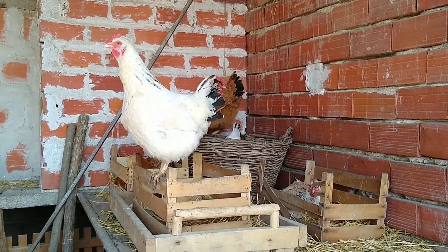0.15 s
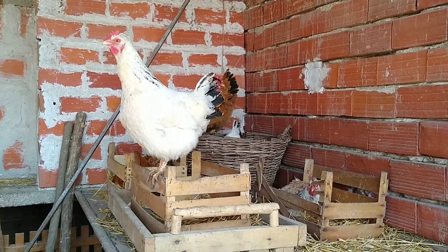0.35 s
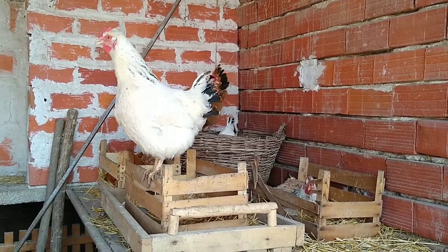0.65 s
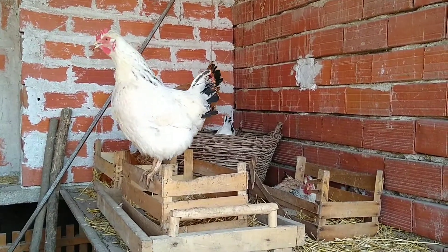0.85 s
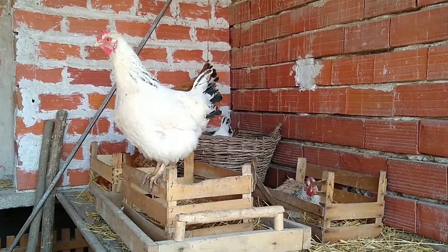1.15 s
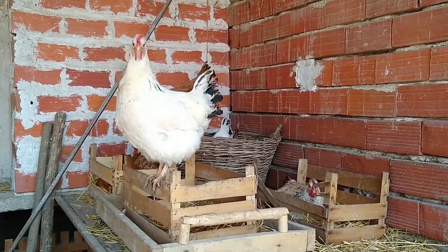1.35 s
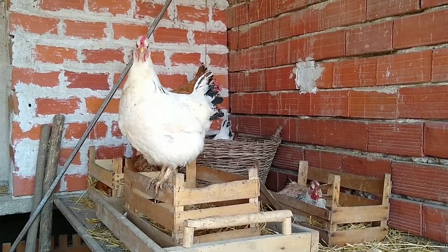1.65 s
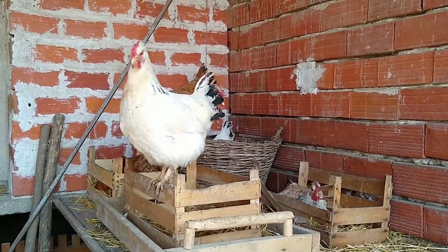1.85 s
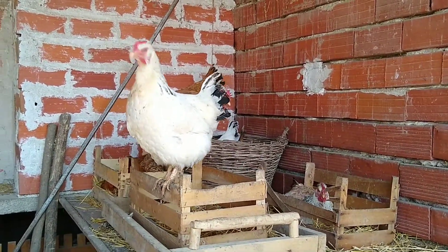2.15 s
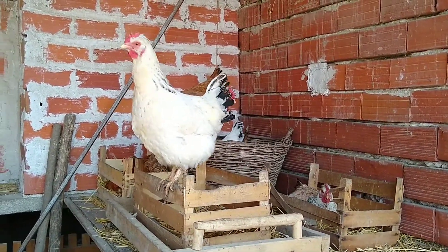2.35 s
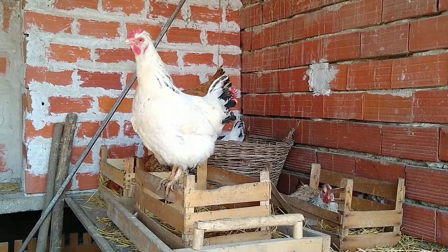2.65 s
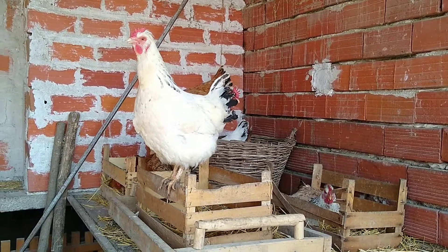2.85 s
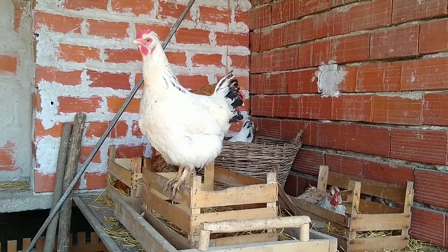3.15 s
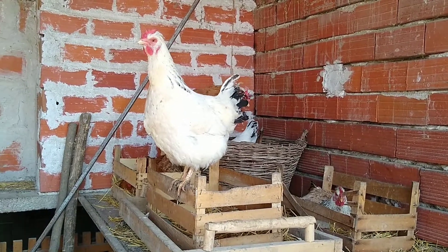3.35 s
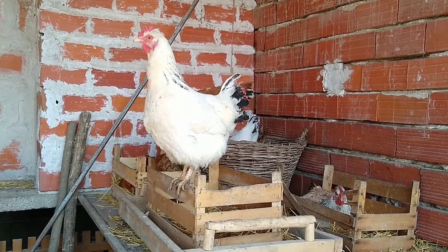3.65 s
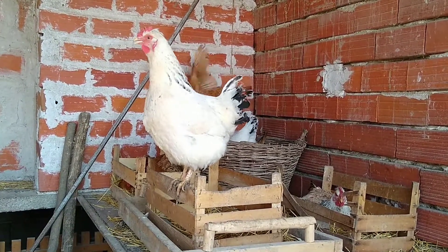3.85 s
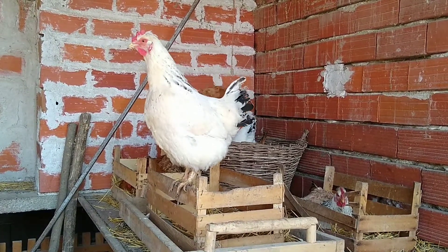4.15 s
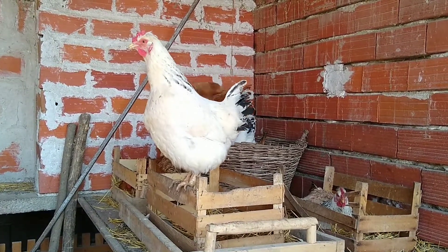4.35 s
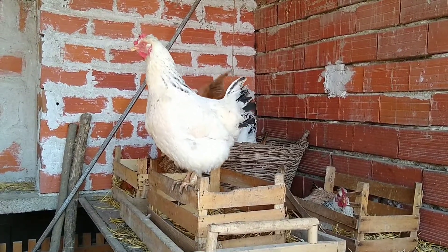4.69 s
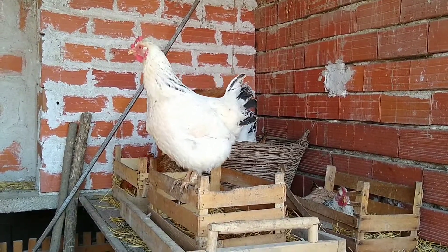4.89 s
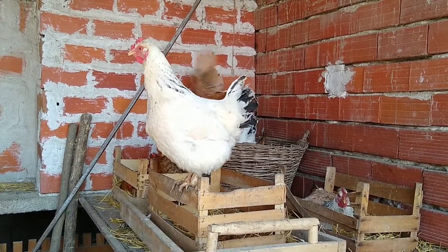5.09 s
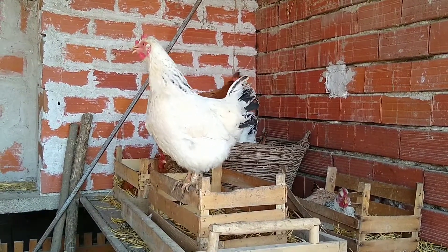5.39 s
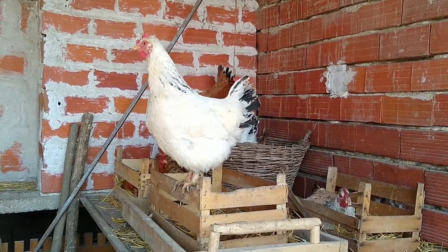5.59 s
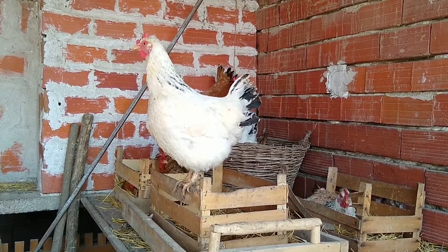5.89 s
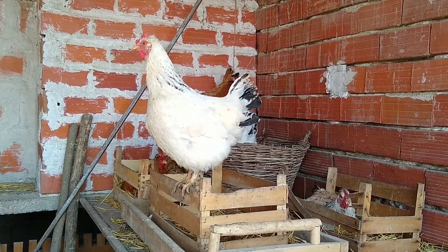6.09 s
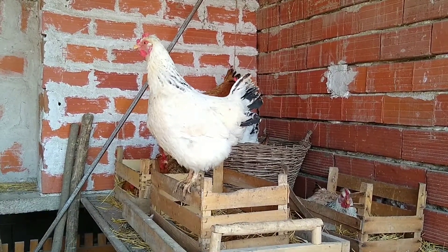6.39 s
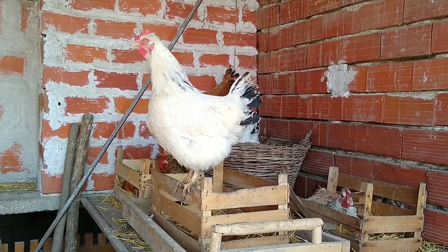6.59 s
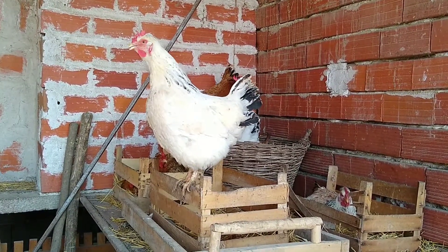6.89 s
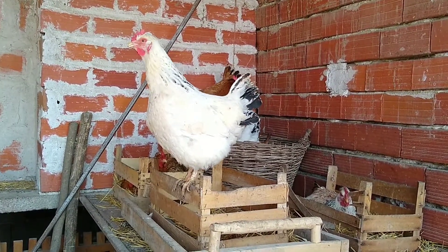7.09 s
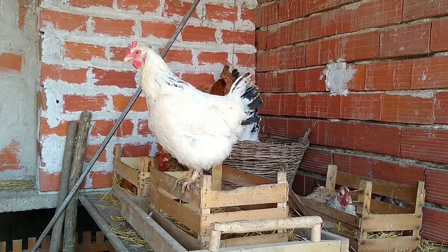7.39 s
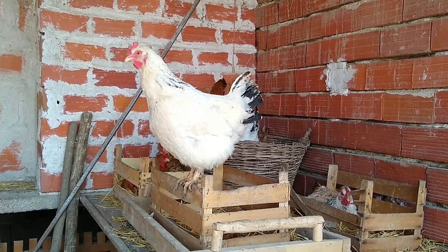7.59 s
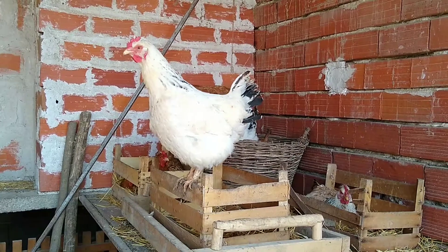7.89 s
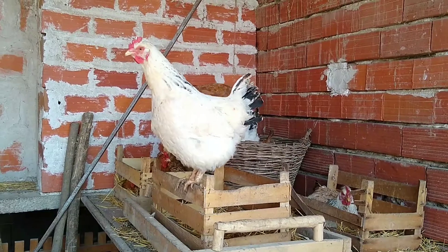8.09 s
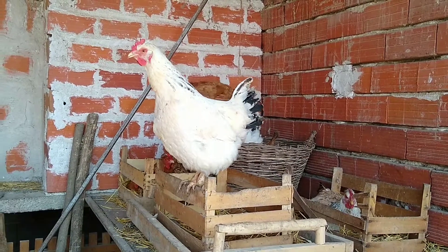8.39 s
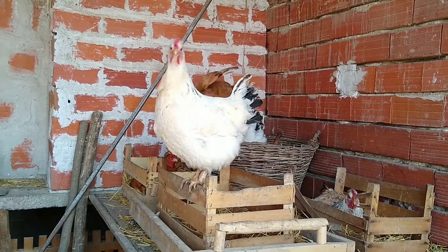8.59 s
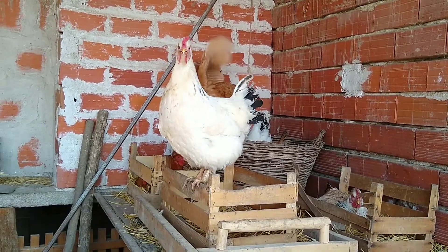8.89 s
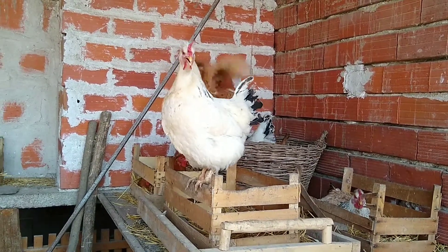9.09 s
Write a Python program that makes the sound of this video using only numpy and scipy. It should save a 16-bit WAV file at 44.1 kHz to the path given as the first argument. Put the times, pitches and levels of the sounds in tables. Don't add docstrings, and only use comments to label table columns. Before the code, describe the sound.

Close hens give rapid raspy clucks, soft answering clucks and occasional stretched squawks between brick walls, with a light breeze brushing the microphone.

```python
import sys
import numpy as np
from scipy import signal
from scipy.fft import rfft, irfft, next_fast_len
from scipy.io import wavfile
from scipy.ndimage import uniform_filter1d

SR = 44100
rng = np.random.default_rng(int(sys.argv[2]) if len(sys.argv) > 2 else 0)


def elevation(decibels):
    levels = np.asarray(decibels, float)
    return 10 ** (levels / 20)


def wav_out(sig):
    wavfile.write(sys.argv[1], SR, np.round(np.clip(np.atleast_2d(sig).T, -1, 1) * 32767).astype(np.int16))


N = 407484


def at_hz(points, hz):
    points = np.array(points)
    return np.interp(np.log(hz + 1), np.log(points[:, 0]), points[:, 1])


def coloured(x, response):
    size = next_fast_len(N + SR // 2)
    hz = np.arange(size // 2 + 1) * SR / size
    return irfft(rfft(x, size) * response(hz), size)[..., :N]


def lag(hz, seconds):
    return np.exp(-2j * np.pi * hz * seconds)


def resonance(x, hz, width_hz):
    r = np.exp(-np.pi * width_hz / SR)
    poles = [1, -2 * r * np.cos(2 * np.pi * hz / SR), r * r]
    return signal.lfilter([(1 - r * r) / 2, 0, (r * r - 1) / 2], poles, x)


def evened(x, seconds):
    return x / np.sqrt(uniform_filter1d(x ** 2, round(seconds * SR)) + 1e-12)


def add(track, start_s, sound):
    at = round(start_s * SR)
    track[max(at, 0):at + len(sound)] += sound[max(-at, 0):N - at]


def voice(pitch_hz, level_db, rough, alternate, upper, upper_db, throat_hz, width_hz,
          chest_hz, chest_db, bright_hz, rasp_db, vary_db):
    size = len(pitch_hz)
    t = np.arange(size) / SR
    timing, push, waver, flutter = rng.standard_normal((4, 400))
    air = rng.standard_normal(size)
    shape = rng.standard_normal(len(upper))

    pitch_hz = pitch_hz * (1 + 0.0075 * np.interp(t * 70, np.arange(400), waver))
    cycle = np.cumsum(pitch_hz / SR).astype(int)
    jitter = (1 + 0.2 * rough ** 2 * timing[cycle]).clip(0.6, 1.4)
    phase = np.cumsum(pitch_hz * jitter / SR) - 0.5
    count = np.round(phase).astype(int)
    offset = phase - count

    top = 2 * int(SR / 3 / pitch_hz.max()) + 1
    pulses = np.sinc(top * offset) / np.sinc(offset) * np.sqrt(top / 2)
    strength = (1 + alternate * (-1.0) ** count) * elevation(3.87 * rough * push[count])
    puffs = 1.1 * rough * air * (1.1 + np.cos(np.pi * offset) ** 2)
    source = strength * pulses + puffs

    closed = np.exp(-t / 0.016)
    low = resonance((1 - closed) * source, throat_hz, width_hz)
    low = low + resonance(closed * source, 0.78 * throat_hz, 120)
    low = resonance(low, 0.99 * throat_hz, 696)
    low = low + elevation(chest_db) * resonance(source, chest_hz, 113)

    breathy = source + 0.55 * air
    high = 0
    for k, (hz, width, db) in enumerate(upper):
        varied_hz = hz * (1 + vary_db / 100 * shape[k - 1])
        ring = resonance(resonance(breathy, hz, 4 * width), varied_hz, width)
        high = high + (-1) ** k * elevation(db + vary_db * shape[k]) * ring
    bright = resonance(resonance(source, bright_hz, 450), bright_hz, 170)
    rasp = elevation(rasp_db) * breathy
    high = evened(high + elevation(12) * bright, 0.1) + rasp

    flutter_db = 2.2 * np.interp(t * 60, np.arange(400), flutter)
    return elevation(level_db + flutter_db) * (evened(low, 0.068) + elevation(upper_db + 6.5) * high)


# (t/s, last push after start/s, held pitch f/Hz, level/dB, sag before the push/dB)
SQUAWK_EVENTS = [
    (-.2, 0.25, 331.8, -11, -0.5),
    (.787, 0.24, 519.4, -11, 16),
    (2.545, 0.12, 491, -18, 6),
    (3.982, .19, 522, -11.5, 11.5),
    (4.907, 0.17, 547.6, -17.5, -1),
    (5.305, .26, 345.2, -10, 0.5),
    (6.768, 0.21, 509.2, -13, 18.5),
    (9.094, 0.18, 464.3, -14.5, 10.5),
]
# (throat f/Hz, brightest upper resonance f/Hz, chest level/dB,
# pitch overshoot/share, pitch glide/share per s)
SQUAWK_BEAKS = [(1295, 3500, -20.5, .01, .01), (1089, 3500, -20.5, 0.22, .1),
                (960, 2800, -15.5, 0.0081, .3), (1087, 3600, -20, 0.16, -0.1),
                (1143, 2680, -22.5, .01, -0.9), (1248, 3115, -19.5, .01, .01),
                (1066, 3480, -20, 0.12, -.25), (1010, 3450, -18.5, .24, .01)]
# (upper throat level/dB, hoarse start/s)
SQUAWK_EDGES = [(-20.5, .05), (-20.5, .075), (-20.5, .05), (-19.5, 0.06), (-14.5, .04), (-18.5, 0.028),
                (-17.5, .05), (-16, 0.0052)]
# (f/Hz, width/Hz, level/dB)
SQUAWK_UPPER = [(1870, 300, 2), (2984, 300, -11), (3460, 630, -2.5), (5340, 450, -18.5)]
# (t/s, length/s, roughness/0-1, strong-weak alternation/0-1)
VOICE_CRACKS = [
    (.085, .07, .3, .5),
    (2.6, .07, .35, .6),
    (4.13, .05, .45, .4),
    (4.95, .08, .12, .7),
    (5.04, .03, .12, .5),
    (5.36, .06, .05, .3),
    (5.5, .07, .2, .35),
    (6.915, .1, .55, .4),
]


def squawks():
    overshoot_s, settle_s, push_s, break_s = 0.032, 0.075, 0.045, 0.025
    attack_s, plateau_s, release_s = 0.014, 0.065, 0.067
    out = np.zeros(N)
    for event, beak, edge in zip(SQUAWK_EVENTS, SQUAWK_BEAKS, SQUAWK_EDGES):
        start, push, pitch_hz, level_db, sag_db = event
        throat_hz, bright_hz, chest_db, overshoot, glide = beak
        upper_db, hoarse_s = edge
        t = np.arange(round((push + release_s + 0.025) * SR)) / SR

        opening = np.interp(t, [0, overshoot_s, settle_s], [overshoot / 2 - 0.0774, overshoot, 0])
        opening = uniform_filter1d(opening, size=900)
        ending = np.interp(t - push, [-push_s, 0, break_s], [0, 0.03, -0.055])
        pitch = pitch_hz * (1 + opening + ending + glide * (t - push / 2))

        sag = sag_db * np.interp(t, [min(plateau_s, push / 2), 0.78 * push, push], [0, 1, 0])
        attack = np.interp(t, [0, attack_s, 2.2 * attack_s], [-14, 3, 0])
        release = np.interp(t - push, [0, release_s, release_s + 0.016], [0, -18.5, -60])

        cracks = np.zeros((2, len(t)))
        for crack_s, length, rough, alternate in VOICE_CRACKS:
            window = np.exp(-(2 * (t + start - crack_s) / length) ** 4)
            cracks += np.outer([rough, alternate], window)
        hoarse = 0.05 + 0.42 * (np.exp(-(t / hoarse_s) ** 2) + (t > push + 0.02) / 2) + cracks[0]

        add(out, start, voice(
            pitch, level_db - sag + attack + release, hoarse.clip(0, 1), cracks[1].clip(0, 1),
            SQUAWK_UPPER, upper_db + 0.24 * sag,
            throat_hz, width_hz=247, chest_hz=0.463 * throat_hz, chest_db=chest_db,
            bright_hz=bright_hz, rasp_db=-20, vary_db=1))
    return out


def clucks(rows, throat_hz, bright_hz, rough, upper, upper_db):
    lead_s = 0.006
    out = np.zeros(N)
    for (start, peak_db, pitch_hz, swell), open_hz, beak_hz in zip(rows, throat_hz, bright_hz):
        swell = swell + lead_s
        t = np.arange(round((swell + 0.076) * SR)) / SR
        effort = np.clip((peak_db + 24) / 10, 0, 1)
        bend = np.interp(t, [0, 0.018, swell, swell + 0.0497], [0.81, 0.97, 1.02, 0.93])
        level = peak_db + np.interp(
            t, [0, 0.012, swell, swell + 0.0076, swell + 0.039, swell + 0.1],
            [-30.5, -15, -4.0, -7.5, -19.5, -43.5])
        alternate = 1 - 0.69 * effort * np.clip(t / swell, 0, 1)
        add(out, start - lead_s, voice(
            2 * pitch_hz * bend, level, rough, alternate.clip(0, 1), upper, upper_db,
            open_hz, width_hz=330 - 170 * effort, chest_hz=pitch_hz, chest_db=-3 - 11.84 * effort,
            bright_hz=beak_hz, rasp_db=-32, vary_db=3))
    return out


# (t/s, peak level/dB, pitch f/Hz, swell/s)
HARD_EVENTS = [(0.629, -8, 270.2, .058), (1.358, -12, 239.3, 0.035), (1.58, -16.5, 209, 0.02),
               (1.784, -16, 213, .028), (1.966, -7.5, 242.9, .042), (2.236, -4.5, 259.1, 0.032),
               (2.506, -10, 257.7, 0.031), (2.62, -7, 235.7, .025), (3.567, -10, 220.6, .021),
               (3.854, -5, 252.1, .039), (4.582, -16.5, 285.7, 0.028), (4.699, -7, 236.2, .029),
               (6.377, -10, 247.5, .03), (6.603, -20, 256.8, .064), (6.638, -6, 247.2, 0.033),
               (7.789, -9.5, 219.9, .036), (8.057, -7.5, 242.4, 0.027), (8.389, -10, 284.6, .038),
               (8.654, -8, 236.1, 0.029), (8.918, -5, 256.4, .034), (9.07, -14, 267.8, .048)]
HARD_BEAKS = [3500, 2900, 3360, 3820, 2740, 2540, 3800, 3680, 3600, 2550, 3315, 3235, 3670, 3480, 3580,
              2970, 2480, 3576, 2770, 2390, 3010]
# (f/Hz, width/Hz, level/dB)
HARD_THROAT = [(2032, 330, -2), (2550, 200, -1), (3590, 200, 3), (5650, 450, -17.5)]


def hard_clucks():
    throat_hz = [975.4 + 5 * (row[1] + 15) for row in HARD_EVENTS]
    return clucks(HARD_EVENTS, throat_hz, HARD_BEAKS, 0.31, HARD_THROAT, upper_db=-23.5)


# (t/s, peak level/dB, pitch f/Hz, swell/s)
SOFT_EVENTS = [(1.138, -28, 259.3, .035), (2.068, -17.5, 284.6, 0.029), (2.35, -17.5, 265.8, .028),
               (2.865, -18, 247, .031), (3.145, -17.5, 266.8, 0.028), (3.41, -25.5, 226.2, 0.086),
               (3.476, -20.5, 286.4, .023), (3.7, -17, 283.4, .03), (4.27, -22.5, 264, .039),
               (4.829, -24, 230, .021), (5.198, -19, 294.4, 0.062), (5.709, -32.5, 212.2, .018),
               (5.935, -31, 214.5, 0.0069), (7.178, -22.5, 270.2, .03), (7.377, -25, 243, 0.024),
               (7.464, -21.5, 251.7, .037), (7.618, -22, 230.5, 0.028), (7.907, -22.5, 227.4, 0.013),
               (8.265, -24, 221.7, .014), (8.563, -21, 213.5, .033), (8.807, -19.5, 247, 0.03)]
SOFT_BEAKS = [3480, 2690, 2930, 3690, 3790, 3920, 3550, 2855, 2960, 3740, 3065, 2890, 2900, 3575, 2950,
              3150, 2800, 2880, 2900, 3080, 3140]
# (f/Hz, width/Hz, level/dB)
SOFT_THROAT = [(1850, 200, 3), (3186, 280, 3), (3940, 660, -2.5), (5500, 450, -22.5)]


def soft_clucks():
    throat_hz = [896 + 6 * (row[1] + 20) for row in SOFT_EVENTS]
    return clucks(SOFT_EVENTS, throat_hz, SOFT_BEAKS, 0.29, SOFT_THROAT, upper_db=-19)


# (t/s, peak level/dB)
CRATE_TAPS = [
    (0.511, -32.5),
]


def taps():
    clicks = np.zeros(N)
    for start, peak_db in CRATE_TAPS:
        clicks[round(start * SR)] = elevation(peak_db + 22.5)
    return resonance(clicks, 400, 320) - resonance(clicks, 1000, 500)


# (f/Hz, level/dB)
BEAK_RADIATION = [(100, -31), (180, -7), (300, -2.5), (600, 13), (1500, -7), (1950, 5), (2700, -3),
                  (4200, -1.5), (5000, -7.5), (7000, -13), (10000, -6), (13000, -5.5), (15500, -0.5)]


def hens():
    flock = hard_clucks() + soft_clucks() + squawks()
    return coloured(flock + taps(), lambda hz: elevation(at_hz(BEAK_RADIATION, hz)))


# (f/Hz, T60/s)
COOP_DECAY = [(150, 1), (1000, 0.4), (4000, 0.4), (12000, 0.36)]


def coop(x):
    lags_s = rng.uniform(0.0096, 0.043, (2, 10))

    def walls(hz):
        t60 = at_hz(COOP_DECAY, hz).clip(0.05, 0.9)
        ports = []
        for port in lags_s:
            total = 0
            for k, delay in enumerate(port):
                once = elevation(-60 * delay / t60) * lag(hz, delay)
                total = total + (-1) ** k * once / (1 - once)
            ports.append(total)
        return np.array(ports)
    return coloured(x, walls)


def ducking():
    t = np.arange(N) / SR
    closed = np.zeros(N)
    for start, push, *_ in SQUAWK_EVENTS:
        if push > 0.15:
            closed += np.interp(t - start, [0.03, 0.15, push + 0.03, push + 0.12], [0, 1, 1, 0])
    return closed


# (t/s, level/dB)
BREEZE_LEVEL = [(0, -63), (.5, -55.5), (1.2, -53), (2.5, -52.5), (3.9, -54.5), (5.2, -53.5), (5.9, -64.5),
                (6.6, -55), (7.05, -65), (7.4, -52.5), (8.5, -54), (9.24, -59.5)]
# (t/s, peak level/dB, start f/Hz, length/s)
BREEZE_BUFFETS = [(0.499, -61.5, 260, 0.063), (0.622, -46, 253, 0.028), (0.717, -55, 245, 0.032),
                  (1.419, -57, 262.5, 0.02), (1.906, -54, 241.7, 0.04), (5.04, -50.5, 330, 0.03),
                  (5.193, -43.5, 251, 0.035), (7.912, -37.5, 248, 0.04), (8.041, -43, 251, 0.035),
                  (8.057, -54.5, 259.3, 0.0091), (8.233, -43.5, 269, 0.071), (8.682, -43.5, 256.4, 0.021),
                  (9.031, -68.5, 226, 0.053)]


def breeze():
    t = np.arange(N) / SR
    lumps_db = 4.9 * np.interp(t, np.arange(300) / 25, rng.standard_normal(300))
    band = signal.butter(3, [55, 115], "band", fs=SR, output="sos")
    rumble = signal.sosfilt(band, rng.standard_normal(N))
    level_db = np.interp(t, *np.transpose(BREEZE_LEVEL)) - 12 * ducking() + lumps_db
    out = rumble / rumble.std() * elevation(level_db)
    for start, peak_db, start_hz, length in BREEZE_BUFFETS:
        u = np.arange(round(2 * length * SR)) / SR / length
        sweep_hz = 70 + (start_hz - 70) * np.exp(-4 * u)
        thump = np.sin(2 * np.pi * np.cumsum(sweep_hz) / SR)
        add(out, start, elevation(peak_db + 19) * thump * u * np.exp(-3.5 * u) * 9)
    return out


# (f/Hz, level/dB per Hz)
YARD_SPECTRUM = [(40, -19), (100, -14.5), (200, -6.5), (450, -19), (1000, -11.5), (2000, -26),
                 (3200, -27.5), (5000, -38), (9000, -47.5), (15000, -57)]


def yard():
    murmur = coloured(rng.standard_normal((2, N)), lambda hz: elevation(at_hz(YARD_SPECTRUM, hz) - 29.5))
    return murmur * elevation([[0], [3]] - 6 * ducking())


def scene():
    direct = hens()
    walls = elevation([[-24], [-20]]) * coop(direct)
    wind = breeze() * elevation([[-16], [3]]) * [[-1], [1]]
    return direct + walls + yard() + wind


def roll_off(x):
    return signal.sosfilt(signal.butter(12, 15500, fs=SR, output="sos"), x)


# (f/Hz, level/dB)
REAR_RESPONSE = [(40, -5.5), (150, -7), (300, -14.5), (600, -7), (1100, -8.5), (1600, -8.5), (2200, -2),
                 (3200, -0.8), (4200, -1.3), (8000, 0), (15000, -2)]
# (f/Hz, level/dB left up and right down)
CAPSULE_TILT = [(100, 1.38), (300, 1.1), (1000, 0.23), (4500, -0.4), (8000, 1.5), (15000, 1.5)]


def record(dry):
    def late(hz):
        return lag(hz, 0.000425) * np.exp(-1j * 0.65)

    def early(hz):
        return 0.76 / (1 + (hz / 8000) ** 4)

    def rear(hz):
        return -elevation(at_hz(REAR_RESPONSE, hz)) * (early(hz) + late(hz)) / 1.63

    mid = coloured(dry[0], lambda hz: (early(hz) - late(hz)) / 1.767)
    side = coloured(dry[1], rear)
    pair = np.array([mid + side, mid - side])
    pair = coloured(pair, lambda hz: elevation(np.outer([1, -1], at_hz(CAPSULE_TILT, hz))))
    ceiling = 0.92
    return roll_off(ceiling * np.tanh(pair / ceiling))


dry = scene()
out = record(dry)
wav_out(out)
```